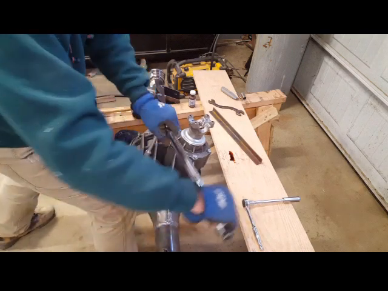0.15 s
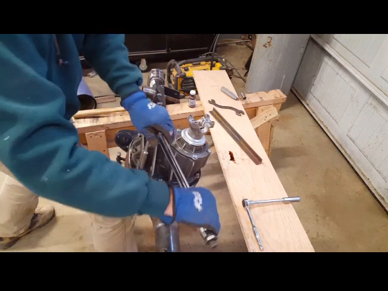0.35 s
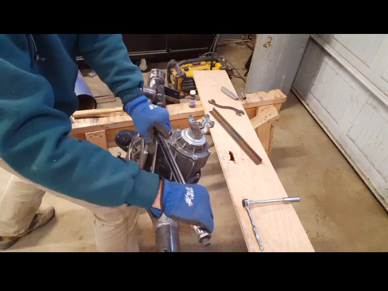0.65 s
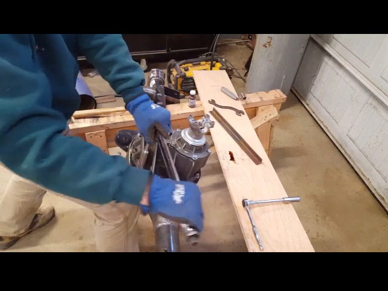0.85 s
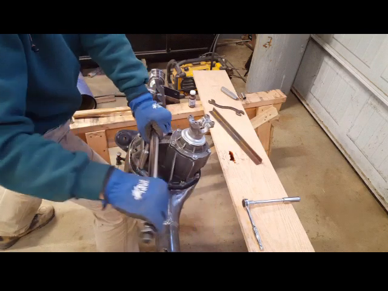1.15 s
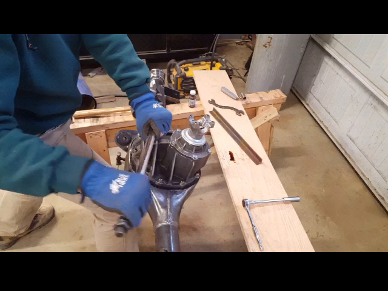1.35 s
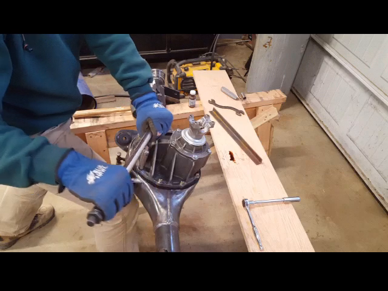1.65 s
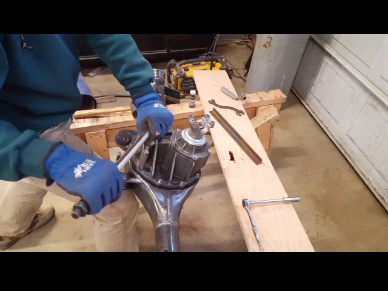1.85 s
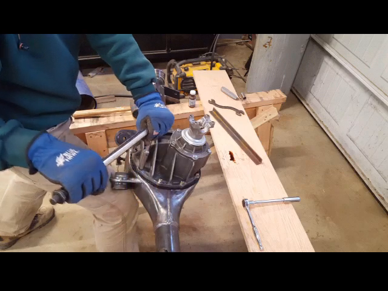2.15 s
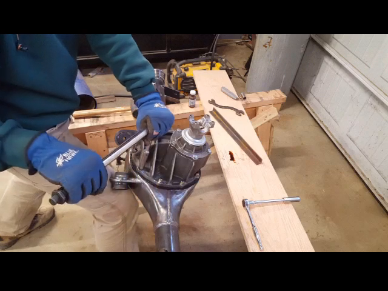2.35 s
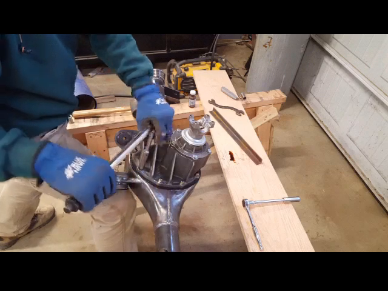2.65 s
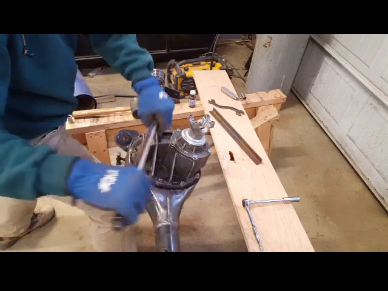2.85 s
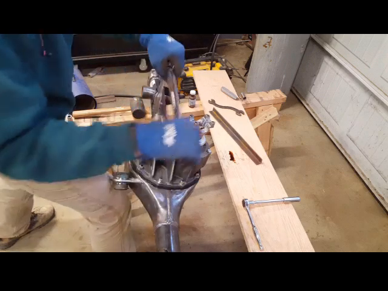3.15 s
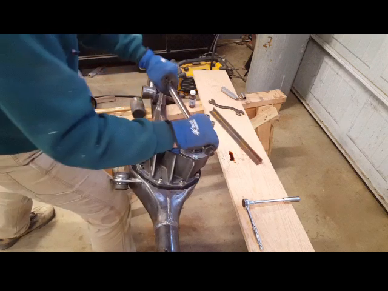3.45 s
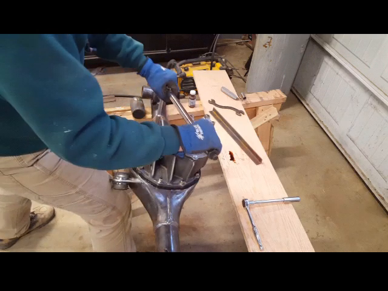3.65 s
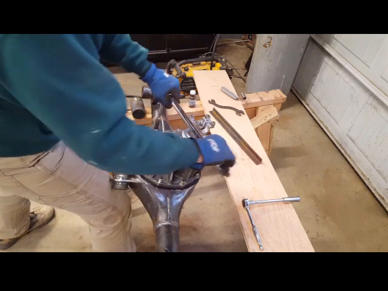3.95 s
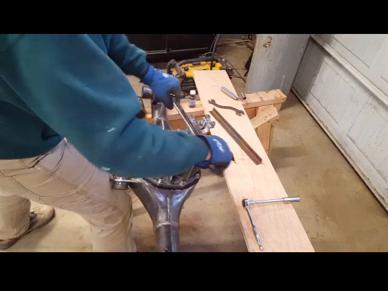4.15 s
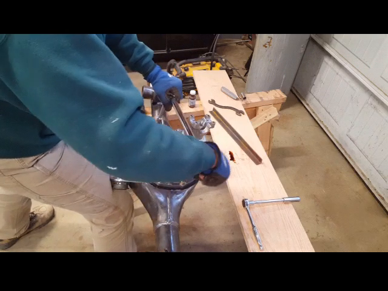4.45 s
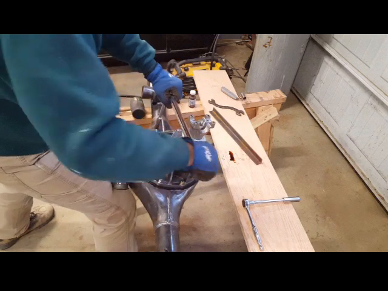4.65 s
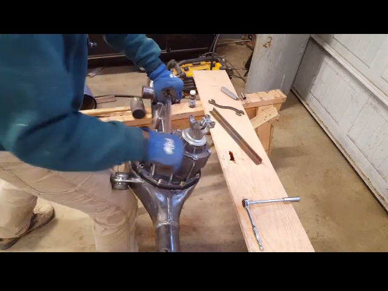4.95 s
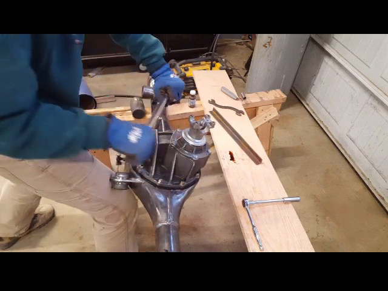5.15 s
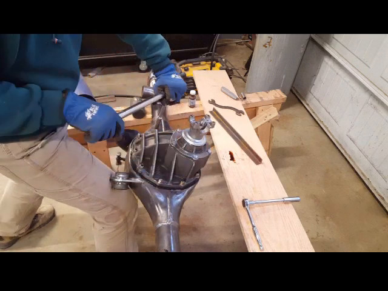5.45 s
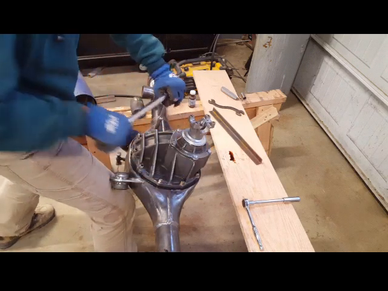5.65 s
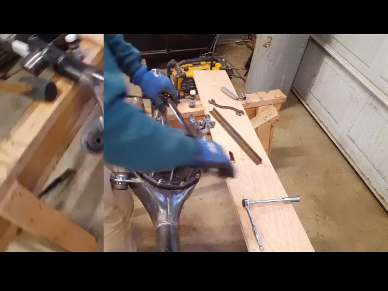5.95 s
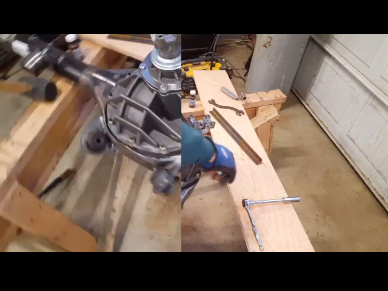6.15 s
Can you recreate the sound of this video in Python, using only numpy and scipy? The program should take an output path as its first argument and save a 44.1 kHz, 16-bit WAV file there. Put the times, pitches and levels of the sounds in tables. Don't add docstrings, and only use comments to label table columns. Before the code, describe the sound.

A gloved worker tightens nuts on a cast axle housing resting on wooden trestles. Cloth and glove scuffs accompany ticks, a slack knock, and two sharp ratchety steel clicks with brief ring. Small knocks and a ping follow as the socket lifts, then it lands, rattles down and sets the housing humming. Light nudges, bright chinks and one heavy clunk close it. Stereo camera microphone, hiss, short concrete reverb.

```python
import sys
import numpy as np
from scipy import signal
from scipy.fft import rfft, irfft
from scipy.io import wavfile
from scipy.ndimage import uniform_filter1d

SR = 44100
rng = np.random.default_rng(int(sys.argv[2]) if len(sys.argv) > 2 else 0)


def to_wav(s):
    ch = np.atleast_2d(s).T
    pcm = np.round(np.clip(ch, -1, 1) * 32767)
    wavfile.write(sys.argv[1], SR, pcm.astype(np.int16))


def amplitude_ratio(level_db):
    exponent = np.asarray(level_db, float) / 20
    return 10 ** exponent


N = 277561


def evened(x):
    return x / np.sqrt(np.mean(x ** 2) + 1e-20)


def read(points, hz):
    f, value = np.transpose(points)
    return np.interp(np.log(hz + 1), np.log(f + 1), value)


def add(mix, s, sound):
    part = mix[round(s * SR):][:len(sound)]
    part += sound[:len(part)]


def causal(db, size=4096):
    cepstrum = irfft(np.maximum(db, -100) * np.log(10) / 20, size)
    cepstrum[1:size // 2] *= 2
    cepstrum[size // 2 + 1:] = 0
    return irfft(np.exp(rfft(cepstrum)), size)[:size // 2]


def noise(db, same, size):
    a, b, c, d = rng.standard_normal((db.shape[1], db.shape[0], 4)).T
    same = np.clip(same, -1, 1)[:, None]
    left = a + 1j * b
    right = same * left + np.sqrt(1 - same ** 2) * (c + 1j * d)
    z = np.array([left, right]) * amplitude_ratio(db)
    return signal.istft(z, SR, nperseg=size, noverlap=size * 3 // 4)[1]


def levelled(x, narrow, wide):
    power = np.mean([abs(rfft(v, 65536)) ** 2 for v in x], 0)
    fine = uniform_filter1d(power, size=16 * narrow)[::16]
    broad = uniform_filter1d(power, size=16 * wide)[::16]
    return signal.fftconvolve(x, causal(-10 * np.log10(fine / broad + 1e-9))[None], axes=1)


def ringing(modes, t, longest, swell):
    shapes = []
    for (hz, db, t60), split in zip(modes, rng.random((len(modes), 3))):
        t60 = np.clip(t60, .02, longest * min(1, 1100 / hz) ** 0.42)
        cluster = np.zeros(len(t))
        for weight, offset, d in zip((1, .5, .35), (0, .007, -.012), split):
            if offset:
                weight *= min(1, hz / 900)
            cluster += weight * np.sin(2 * np.pi * hz * (1 + offset * (.4 + d)) * t)
        rise_s = swell * (1000 / hz) ** (.35 if hz < 1000 else 2.1)
        shapes.append(amplitude_ratio(db - 60 * t / t60) * cluster * (1 - np.exp(-t / rise_s)))
    return np.array(shapes)


def blows(events, tone, modes, rattle, longest, swell=0.01, vary_db=1.5, thin_db=-6):
    out, hz = np.zeros((3, N)), np.fft.rfftfreq(4096, 1 / SR)
    t = np.arange(max(round(longest * SR), 4000)) / SR
    rattle = max(rattle, 3e-4)
    shapes = ringing(modes, t, longest, swell)
    mode_hz = np.transpose(modes)[0]
    brief = t[:3000]
    for s, peak_db, bright_db, ring_db in events:
        draw, spot = rng.standard_normal((3, 3000)), rng.standard_normal(len(modes))
        onset = np.minimum(brief / (.14 * rattle), 1)
        force = np.exp(0.24 * draw[2] - brief / rattle) * onset
        tilt = [(300, -bright_db), (1500, 0.012), (3000, 0.011), (8000, bright_db)]
        colour = read(tone, hz) + read(tilt, hz)
        click = causal(colour)
        near = causal(colour + read([(700, thin_db), (2000, 0.02)], hz))
        grains = [levelled(d[None] * force, narrow=40, wide=600)[0] for d in draw[:2]]
        cracks = signal.fftconvolve(grains, near[None], axes=1)
        ring = amplitude_ratio(read(tilt, mode_hz) + vary_db * spot) @ shapes
        ring = ring / ring[:2000].std()
        gain = amplitude_ratio(peak_db - 9.0) / np.linalg.norm(click)
        room_crack = np.linalg.norm(force) * click
        for row, crack, send_db in zip(out, [*cracks, room_crack], (0, 0, -10)):
            add(row, s, gain * crack)
            add(row, s, amplitude_ratio(peak_db + ring_db + send_db - 18) * ring)
    return out


# pitch_hz, level_db (per Hz)
HISS = [(18, -44), (30, -22.5), (49, -3.5), (101, -4.5), (249, -13.5), (451, -16.5), (795, -18),
        (1080, -19), (1860, -20.5), (2060, -22.5), (2230, -22), (6770, -29), (10500, -32), (14300, -30)]
# pitch_hz, left_right_likeness
HISS_SAME = [(30, .8), (60, .72), (150, .35), (380, .1), (950, 0), (15000, 0)]


def hiss():
    hz, frames = np.fft.rfftfreq(2048, 1 / SR), N // 512 + 5
    patches = rng.standard_normal((frames, len(hz))).T
    patches = evened(uniform_filter1d(uniform_filter1d(patches, 8, 0), 6, 1))
    field_db = read(HISS, hz)[:, None] + 0.9 * patches
    return amplitude_ratio(-68.5) * evened(noise(field_db, read(HISS_SAME, hz), size=2048))[:, :N]


# pitch_hz, t60_s, level_db
SCUFFS = [(315, 0.059, 4), (407, 0.059, -1.5), (632, .08, -2.5), (714, 0.067, 0.5), (970, 0.13, -6.5),
          (1505, 0.035, -8), (2086, 0.025, -8)]


def scuffs(per_s=160, spread_db=3.5):
    size = amplitude_ratio(spread_db * np.minimum(rng.exponential(1, N), 3)) * (rng.random(N) < per_s / SR)
    kind, t = rng.integers(0, len(SCUFFS), N), np.arange(3000) / SR
    total = np.zeros(N)
    for k, (f, t60, db) in enumerate(SCUFFS):
        ring = amplitude_ratio(db - 60 * t / t60) * np.sin(2 * np.pi * f * t) * (1 - np.exp(-t / 0.001))
        total += signal.oaconvolve(size * (kind == k), ring)[:N]
    return evened(total)


# fastest_s (moment of fastest motion), length_s, rustle_db, lift_scrape_db,
# settle_scrape_db
MOVES = [(0.01, 0.36, -64, -52.5, -53.5), (0.206, 0.9, -61.5, -72, -78), (0.68, 1.65, -67, -104, -99),
         (2.921, 0.67, -61.5, -74, -65), (3.58, 0.64, -74, -69, -88), (3.67, 0.75, -61.5, -77.5, -77),
         (3.725, 0.55, -84, -85, -66), (4.649, 1.21, -61, -68.5, -70), (5.55, 1.6, -74, -79, -86),
         (6.024, 0.84, -64, -68, -71), (6.212, 0.34, -60, -56, -61)]
# pitch_hz, level_db (per Hz)
RUSTLE = [(35, -46), (60, -20.5), (213, -11), (400, -8.5), (477, -10), (1600, -21), (2620, -22.5),
          (4000, -31.5), (6000, -30), (12000, -39.5)]
# pitch_hz, width_hz, level_db
LIFT = [(2000, 90, -5), (4300, 140, 0), (6100, 300, -12), (8650, 120, -8)]
# pitch_hz, width_hz, level_db
SETTLE = [(2050, 200, -3), (2660, 70, 4), (4290, 200, -12), (6300, 350, -12)]


def handling(speed_up=0.53, still_db=-24):
    hz, t = np.fft.rfftfreq(512, 1 / SR), np.arange(N // 128 + 5) * 128 / SR
    s, length, *peak_db = np.transpose(MOVES)[:, :, None]
    slowing = np.maximum((s - t) / (speed_up * length), (t - s) / ((1 - speed_up) * length))
    move_db = np.array(peak_db) + still_db * slowing ** 1.36
    rustle, *scrapes = np.sqrt((amplitude_ratio(move_db) ** 2).sum(1))
    patches = rng.standard_normal((len(t), len(hz))).T
    patches = evened(uniform_filter1d(uniform_filter1d(patches, 5, 0), 12, 1))
    grit = evened(rng.standard_normal(len(t)))
    cloth = evened(noise(read(RUSTLE, hz)[:, None] + 1.8 * patches, .8 + 0 * hz, size=512))
    steel = 0
    for peaks, level in zip((LIFT, SETTLE), scrapes):
        band = amplitude_ratio(-43.0) * (hz > 1500)
        for f, width, db in peaks:
            band = band + amplitude_ratio(2 * db) / (1 + ((hz - f) / width * 2) ** 2)
        steel = steel + np.outer(band / band.mean(), level ** 2)
    slide_db = 10 * np.log10(steel + 1e-20) + 2.3 * grit + 1.1 * patches - 27
    slide = noise(slide_db, .5 + 0 * hz, size=512)
    speed = np.interp(np.arange(N) / SR, t, rustle)
    return (cloth[:, :N] + amplitude_ratio(-6) * scuffs()) * speed + slide[:, :N]


# start_s, level_db (peak), brightness_db, ring_db (against the crack)
TICKS = [
    (0.0253, -18.5, 9.5, -15),
    (0.1126, -18, 11, -11.5),
    (2.9961, -25.5, 1.5, -29),
    (4.4872, -24.5, 0, -16),
    (4.7586, -32, -1, -26),
]
# pitch_hz, level_db (per Hz)
TICK_TONE = [(70, -46), (160, -14.5), (751, -3.5), (1060, -1.5), (1510, -8), (1940, 0.5), (3620, -4.5),
             (4140, -8), (4480, -10.5), (8490, -19), (13500, -24), (15500, -27.5)]
# pitch_hz, level_db, t60_s
TICK_RING = [(1080, 3, .5), (2190, 9, .04), (2934, -1, .2), (3187, -6, .2), (4190, 5, .05), (4888, -10, .2),
             (5230, -6, .2), (5868, 4, .1), (8075, 0, .08), (9500, -6, .08)]


def ticks():
    return blows(TICKS, TICK_TONE, TICK_RING, rattle=0.00147, longest=0.6, swell=0.0044, vary_db=2.0)


# start_s, level_db (peak), brightness_db, ring_db
KNOCKS = [(0.218, -46, 7, -3), (0.355, -47, -1, -5), (0.383, -41, 13, 1), (0.396, -36, -10.5, -3),
          (0.686, -48, -1, -36), (3.0407, -32.5, 14, -28), (3.075, -32.5, 7.5, -10), (3.09, -30, 7.5, -2),
          (3.104, -32, 5.5, -18), (3.118, -44, 18, 1), (4.667, -42, 18, -31), (4.779, -36.5, -4.5, -18)]
# pitch_hz, level_db (per Hz)
KNOCK_TONE = [(55, -63), (100, -8), (196, -6.5), (497, -12), (998, -6.5), (1400, -12.5), (3250, -16),
              (4370, -32.5), (13400, -54), (15500, -62)]
# pitch_hz, level_db, t60_s
KNOCK_RING = [(180, -6, .15), (604, -11, 0.7), (870, -7, 0.15), (972, 0, 0.14), (1065, -2, 0.17),
              (1095, -3, .15), (2200, -8, 0.06), (2500, -5, .05)]


def knocks():
    return blows(KNOCKS, KNOCK_TONE, KNOCK_RING, rattle=0.0033, longest=0.43, swell=0.0076)


# start_s, level_db (peak), brightness_db, ring_db
SLACK = [
    (1.042, -45, 22, -25),
    (1.0745, -16.5, 6, -10),
    (1.083, -34, -22, -1),
]
# pitch_hz, level_db (per Hz)
SLACK_TONE = [(59, -30), (100, -13), (487, -7), (900, -4.5), (1350, -5), (2730, -15.5), (3070, -21.5),
              (3610, -21.5), (8370, -49), (10200, -49), (12000, -54), (15600, -80), (22000, -120)]
# pitch_hz, level_db, t60_s
SLACK_RING = [(189, -1, .12), (388, 2, .13), (608, -3, .45), (872, 1, .35), (1066, -4, .5), (1147, 1, .3),
              (1265, -2, .42), (1303, 1, .33), (1340, 13, .03), (1421, -7, .35), (1744, -2, .28),
              (2690, -1, .5), (3560, -6, .2), (3994, -14, .2)]


def slack():
    return blows(SLACK, SLACK_TONE, SLACK_RING, rattle=0.0015, longest=0.57, swell=0.001,
                 vary_db=0.5, thin_db=-8)


# start_s, level_db
SHAKES = [
    (1.08, -64),
    (2.42, -47),
    (2.73, -49.5),
    (3.102, -67),
    (3.94, -49),
    (4.19, -40),
]
# pitch_hz, level_db (per Hz)
TRESTLE = [(30, -22), (55, -9), (90, 5), (190, 6.5), (280, -9), (500, -67.5)]


def trestles(rise_s=0.12, t60_s=0.94):
    hz, t, level = np.fft.rfftfreq(2048, 1 / SR), np.arange(SR) / SR, np.zeros(N)
    for s, db in SHAKES:
        add(level, s, amplitude_ratio(db - 60 * t / t60_s) * (1 - np.exp(-t / rise_s)))
    field_db = read(TRESTLE, hz)[:, None] + np.zeros(N // 512 + 5)
    return level * evened(noise(field_db, 1.1 + 0 * hz, size=2048))[:, :N]


# start_s, level_db (peak), brightness_db, ring_db
BREAK = [
    (2.4152, -5.5, 2, -11.5),
    (2.4176, -10, 5, -30),
    (2.4215, -11.5, -1.5, -30),
    (2.427, -11, -2.5, -30),
]
# pitch_hz, level_db (per Hz)
BREAK_TONE = [(88, -49), (150, -22), (530, -13.5), (850, -6), (1500, -11.5), (2100, -7.5), (2600, -6),
              (2810, -8), (4140, -8), (5130, -15), (8010, -13.5), (13500, -18.5), (14300, -22),
              (15500, -54.5)]
# pitch_hz, level_db, t60_s
BREAK_RING = [(183, -6, .3), (330, -9, .3), (868, 5, 0.15), (1075, -1, 0.3), (1744, -8, .3),
              (2035, -2, 0.35), (2606, 0, 0.25), (2671, 9, 0.42), (3505, -3, 0.25), (4145, 2, 0.25),
              (4640, -8, 0.25), (8500, 3, 0.08), (9570, -1.5, 0.1), (3000, -5, 0.25)]


def break_over():
    return blows(BREAK, BREAK_TONE, BREAK_RING, rattle=0.0037, longest=1.2, swell=.008,
                 vary_db=3.1, thin_db=-10)


# start_s, level_db (peak), brightness_db, ring_db
RESET = [
    (2.709, -9, 1.5, -25.5),
    (2.7113, -4, -1.5, -6.5),
    (2.7143, -9.5, 0, -24.5),
    (2.717, -13, 3.5, -25),
    (2.7245, -18, -10, -12),
]
# pitch_hz, level_db (per Hz)
RESET_TONE = [(88, -58), (150, -23), (290, -22.5), (844, -11.5), (1090, -7.5), (1290, -15), (2650, -7),
              (2980, -9), (3550, -5), (4480, -12), (9540, -8), (14300, -19.5), (15500, -33.5)]
# pitch_hz, level_db, t60_s
RESET_RING = [(183, -13, .6), (317, -9, 0.5), (1080, 7, 0.3), (1072, -7, .7), (1916, -10, 0.3),
              (2255, -12, 0.35), (2675, -3, 0.36), (3015, -7, 0.3), (3545, 12, 0.05), (3600, -4, .26),
              (4043, -9, 0.25), (7380, -3, 0.1), (8581, 4, 0.06), (9720, 5, 0.1)]


def reset():
    return blows(RESET, RESET_TONE, RESET_RING, rattle=0.0036, longest=0.91, swell=0.03,
                 vary_db=0.04, thin_db=-4.5)


# start_s, level_db (peak), brightness_db, ring_db
PINGS = [
    (3.0175, -44, 8, -11),
    (3.171, -33, 4, -12),
]
# pitch_hz, level_db, t60_s
PING_RING = [(1500, 4, .03), (4600, -10, .03), (6900, -3, .025), (7700, 2, .035), (8300, -4, .03),
             (11200, -8, .03)]


def pings():
    return blows(PINGS, TICK_TONE, PING_RING, rattle=0.0007, longest=.2, swell=0.00054, vary_db=5.5)


# start_s, level_db (peak), brightness_db, ring_db
LANDING = [
    (3.931, -28, -14, -23),
    (3.934, -23, 3, -3),
    (3.945, -33, -9.5, -2.5),
    (4.01, -31, -3, -16),
]
# pitch_hz, level_db (per Hz)
SEAT_TONE = [(71, -20), (120, -12.5), (519, -8.5), (636, -3), (812, -4), (936, 0), (1690, -7), (1870, -10),
             (2590, -5), (4570, -18.5), (9510, -25.5), (14300, -35), (15500, -93)]
# pitch_hz, level_db, t60_s
LANDING_RING = [(322, -7, .7), (576, -5, .4), (610, 0, .4), (650, 3, .4), (900, -4, .2), (1087, -4, .3),
                (1373, -6, .2), (1744, -9, .15), (2250, -8, .1), (2638, -10, .18), (2864, -15, .3)]


def landing():
    return blows(LANDING, SEAT_TONE, LANDING_RING, rattle=0.0067, longest=.8, vary_db=4.0)


# start_s, level_db (peak), brightness_db, ring_db
DROP = [
    (4.029, -25.5, 2, -1.5),
]
# pitch_hz, level_db (per Hz)
DROP_TONE = [(88, -39.5), (150, -11.5), (244, -25), (314, -9), (450, -15.5), (656, -2.5), (812, -29),
             (1060, -15.5), (1170, -15.5), (4390, -15.5), (5130, -14), (6350, -29), (12500, -32),
             (15500, -60)]
# pitch_hz, level_db, t60_s
DROP_RING = [(316, 20, 1.4), (650, 11, 0.25), (607, 7, .3), (4950, 4, .15), (1095, 6, 0.2)]


def drop():
    return blows(DROP, DROP_TONE, DROP_RING, rattle=0.031, longest=0.94, swell=0.02, vary_db=-4.0)


# start_s, level_db (peak), brightness_db, ring_db
SEAT = [
    (4.177, -13, 5.5, -9.5),
    (4.185, -12, -0.5, -31),
    (4.196, -13, -4, -0.5),
    (4.203, -22.5, 64, -26),
    (4.211, -13, 2.5, -2),
    (4.223, -39, -23, 9.5),
    (4.238, -41.5, 8, -31),
    (4.284, -21, -7, -0.5),
]
# pitch_hz, level_db, t60_s
HOUSING_RING = [(316, -8, 0.7), (574, -3, .35), (605, -1, 0.42), (645, 0, 0.37), (1066, -2, 0.3),
                (1092, -4, .22), (1258, -17, 0.25), (935, -1, 0.16), (745, -12, 0.15), (1760, -9, 0.25),
                (1618, -12, 0.35), (2196, -12, 0.35), (3040, -5, 0.4), (1443, -11, 0.27)]


def seating():
    return blows(SEAT, SEAT_TONE, HOUSING_RING, rattle=0.0091, longest=1.0, swell=0.011, vary_db=-0.5)


# start_s, level_db (peak), brightness_db, ring_db
NUDGES = [(5.925, -51, 0, 2.5), (5.948, -48, 6, 2), (6.012, -46.5, -2, 1.5), (6.048, -45, -1.5, 4),
          (6.14, -53, 5, 7), (6.205, -45, 8, 0.5)]
# pitch_hz, level_db, t60_s
NUDGE_RING = [(318, 2, .3), (400, -4, .12), (590, -3, .15), (720, -6, .1), (960, -1, .1), (1600, -9, .08)]


def nudges():
    return blows(NUDGES, KNOCK_TONE, NUDGE_RING, rattle=0.0047, longest=.4, swell=0.0084)


# start_s, level_db (peak), brightness_db, ring_db
CHINKS = [
    (6.083, -44, 3, -18.5),
    (6.137, -19, 4.5, -18),
    (6.1444, -34, -16, 0.5),
    (6.198, -21.5, 3.5, -8),
    (6.2066, -27, 3, -5),
]
# pitch_hz, level_db (per Hz)
CHINK_TONE = [(88, -50), (150, -34), (681, -2.5), (1240, -11), (1600, -4.5), (2650, 1), (3830, -2),
              (5130, -2), (7270, -5.5), (8330, 0), (14100, -9), (15500, -25)]
# pitch_hz, level_db, t60_s
CHINK_RING = [(1680, 1.5, 0.056), (2710, -3, 0.079), (2955, 0, .08), (5100, 3, 0.062), (6100, -4, 0.1),
              (8500, -7, 0.08), (9100, -19, 0.1), (9570, 4, 0.1)]


def chinks():
    return blows(CHINKS, CHINK_TONE, CHINK_RING, rattle=0.0022, longest=0.13, swell=0.0018)


# start_s, level_db (peak), brightness_db, ring_db
CLUNK = [
    (6.2895, -6, -3, -6),
]
# pitch_hz, level_db (per Hz)
CLUNK_TONE = [(120, -34), (500, -17), (900, -5.5), (1200, 0), (1620, -3.5), (2420, 3), (3600, -7.5),
              (4310, -4.5), (5970, -24), (6650, -11), (14800, -22.5), (15500, -49.5)]


def clunk():
    return blows(CLUNK, CLUNK_TONE, SLACK_RING, rattle=0.007, longest=0.28, swell=0.0012,
                 vary_db=-2.5, thin_db=-0.5)


# pitch_hz, t60_s
GARAGE = [(150, 0.69), (400, 0.6), (1040, 0.62), (2760, 0.51), (5000, 0.41), (8000, 0.35), (13000, 0.23)]
# pitch_hz, left_right_likeness
ROOM_SAME = [(100, 0.96), (300, 0.97), (700, 0.11), (2000, 0.12), (12000, 0.027)]


def garage(x, gap=0.0011, near_share=0.35, near_db=5):
    hz, t = np.fft.rfftfreq(256, 1 / SR), np.arange(700) * 64 / SR
    walls_db = -60 * t / read(GARAGE, hz)[:, None]
    both_db = 10 * np.log10(amplitude_ratio(2 * walls_db) + amplitude_ratio(2 * (near_db + walls_db / near_share)))
    tail = noise(both_db, read(ROOM_SAME, hz), size=256)
    tail = tail * np.clip(np.arange(tail.shape[1]) / SR / gap - .5, 0, 1)
    tail = levelled(tail, narrow=5, wide=60)
    return signal.fftconvolve(x[None], tail / np.linalg.norm(tail[0]), axes=1)[:, :N]


# pitch_hz, level_db (left minus right)
PORTS = [(60, -3), (180, -3), (550, -2.5), (1650, -1), (4970, -5), (15000, 1.5)]


def at_ports(left, right, spread, shared_hz=2190):
    late = np.pad(left, (3, 0))[:N]
    right = right + signal.lfilter(*signal.butter(1, shared_hz, fs=SR), late - right)
    lean_db = read(PORTS, np.fft.rfftfreq(4096, 1 / SR)) / 2
    ports = np.array([causal(lean_db), causal(-lean_db)])
    heard = np.array([left, right]) + amplitude_ratio(-1.5) * garage(spread)
    return signal.oaconvolve(heard, ports, axes=1)[:, :N]


def scene():
    metal = ticks() + knocks() + slack() + break_over() + reset() + pings()
    metal += landing() + drop() + seating() + nudges() + chinks() + clunk()
    return at_ports(*metal) + handling() + hiss() + trestles()


def treble_gated(x, under_db=48, patchy_db=3.5, faint_db=-88, quiet_edge_hz=14480):
    hz, _, z = signal.stft(x, SR, nperseg=1024, noverlap=768)
    power = (abs(z) ** 2).mean(0) + 1e-20
    band_db = 10 * np.log10(uniform_filter1d(power, size=13, axis=0))
    whole_db = 10 * np.log10(power[hz > 300].sum(0))
    patches = np.kron(rng.standard_normal((power.shape[1] // 4 + 1, 43)).T, np.ones((12, 4)))
    limit_db = whole_db - under_db - 11 * np.log2(12000 / (hz[:, None] + 1))
    hidden = band_db < limit_db + patchy_db * patches[:len(hz), :len(whole_db)]
    hidden &= whole_db > -65
    faint = (hz[:, None] > quiet_edge_hz) & (band_db < faint_db)
    return signal.istft(z * ~(hidden | faint), SR, nperseg=1024, noverlap=768)[1][:, :N]


def top_cut(x):
    return signal.sosfilt(signal.butter(12, 15720, fs=SR, output="sos"), x)


def record(dry):
    lowpass = signal.firwin(255, 15700, window=("kaiser", 8), fs=SR)
    limited = signal.oaconvolve(dry, lowpass[None], "same")
    mix = treble_gated(limited) - .0005
    return top_cut(mix)


dry = scene()
out = record(dry)
to_wav(out)
```